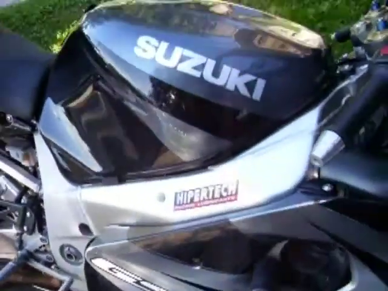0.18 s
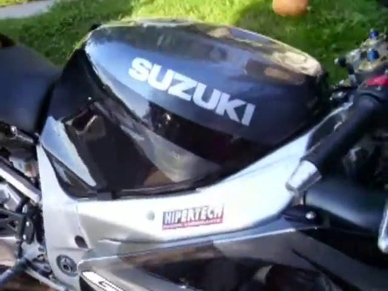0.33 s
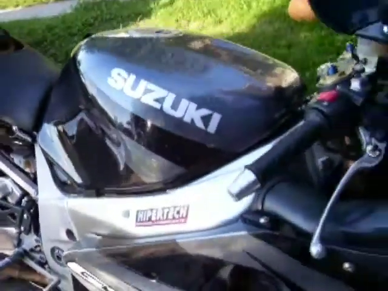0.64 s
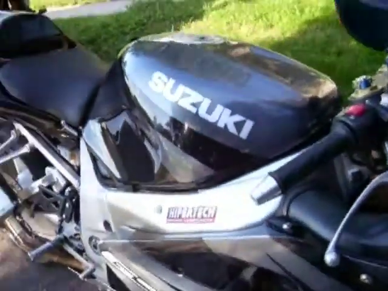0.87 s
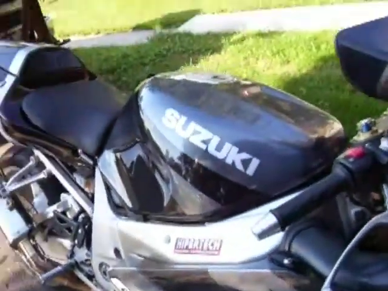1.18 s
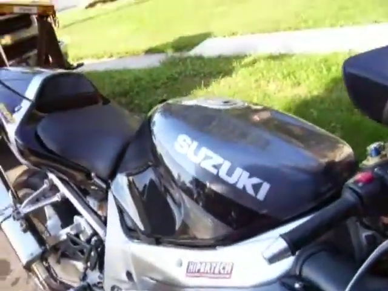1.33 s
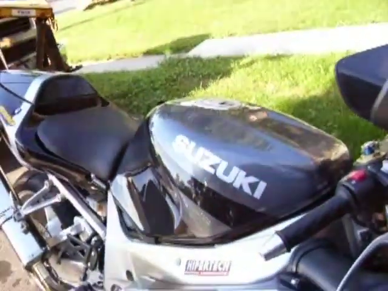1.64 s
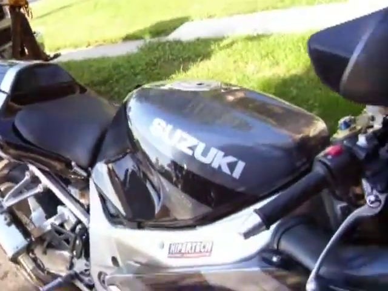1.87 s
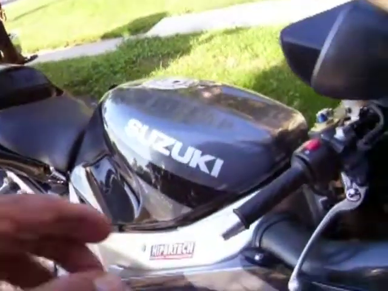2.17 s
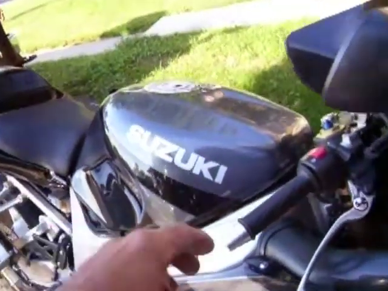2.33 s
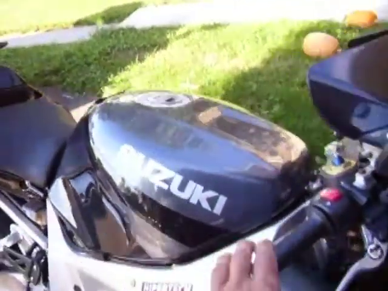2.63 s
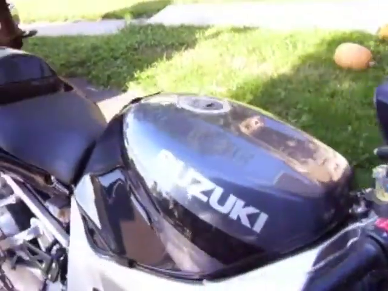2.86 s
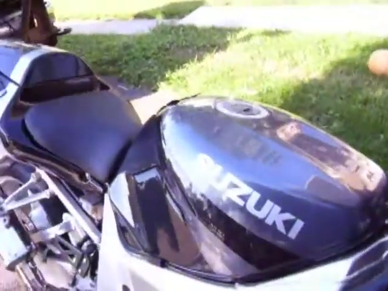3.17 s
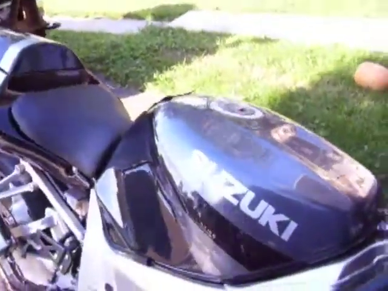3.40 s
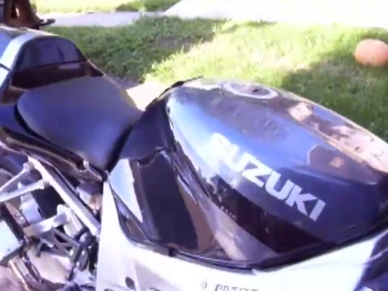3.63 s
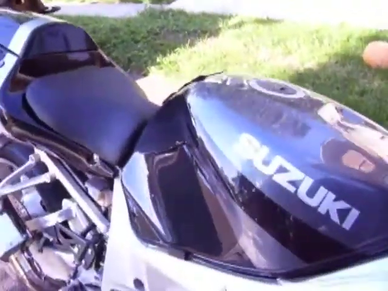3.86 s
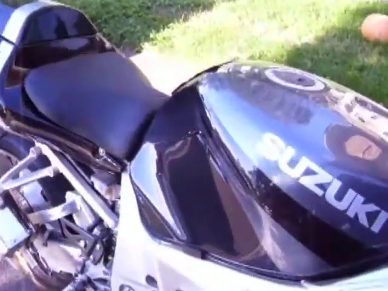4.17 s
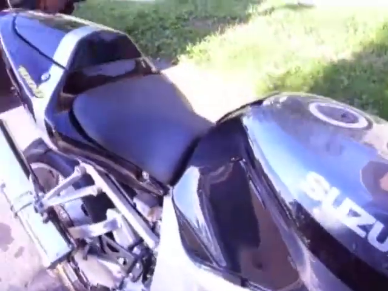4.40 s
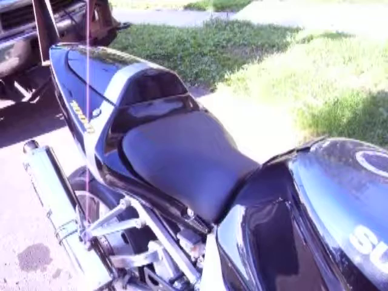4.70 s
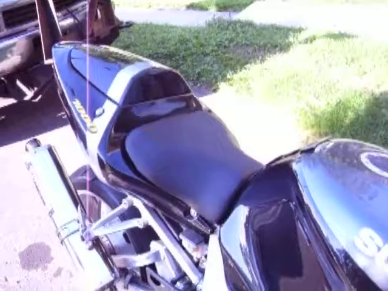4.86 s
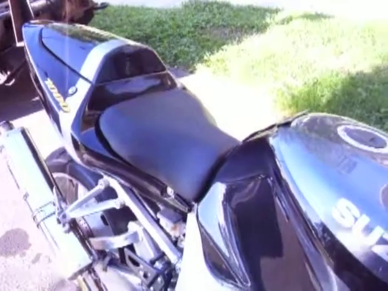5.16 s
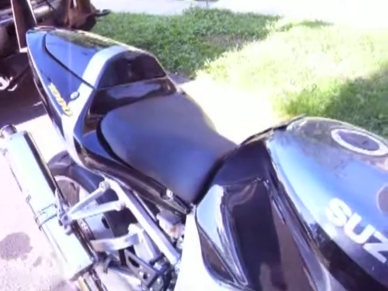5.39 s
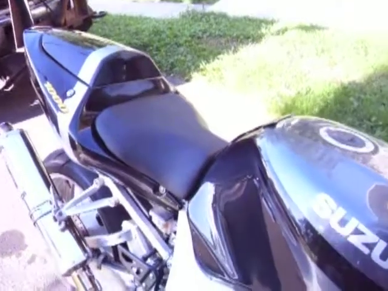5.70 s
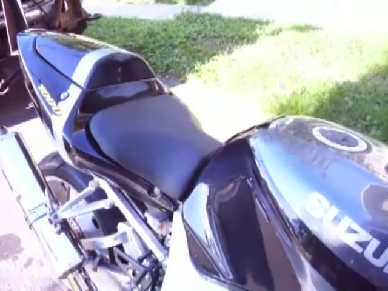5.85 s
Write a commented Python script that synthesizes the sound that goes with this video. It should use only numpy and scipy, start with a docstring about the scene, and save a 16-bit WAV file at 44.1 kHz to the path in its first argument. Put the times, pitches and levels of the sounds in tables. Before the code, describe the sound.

A sport motorcycle is already idling outdoors, close to a cheap handheld microphone. The low exhaust beat surges five or six times a second over dense valve and clutch rattle and a thin gear whine. A rasp fades in the first second; the hollow case ring thins mid-way, then returns. The level ducks suddenly and creeps back, with dull, clipped, crackly sound and two faint hooting tones near the end.

```python
"""A four-cylinder sport motorcycle idles in a yard: impulses from its firings excite the exhaust resonances,
hard and soft by turns, over a hum, as the crank speed hunts between five and six times a second.
From the start valves and clutch strike the cases, gear teeth whine by meshing, and a rasp fades within a second or so;
the ring of the cases sinks after about two seconds and returns after three and a half. Throughout, the level drops
abruptly and creeps back, and a clipped narrow-band channel crackles; near the end two brief tones hoot."""
import sys
import numpy as np
from scipy import signal
from scipy.fft import rfft, irfft, next_fast_len
from scipy.io import wavfile
from scipy.ndimage import uniform_filter1d

SR = 44100
rng = np.random.default_rng(int(sys.argv[2]) if len(sys.argv) > 2 else 0)


def store_wav(level_fs):
    """Save 16-bit WAV to argv[1]."""
    pcm = np.round(np.clip(np.atleast_2d(level_fs), -1, 1) * 32767)
    wavfile.write(sys.argv[1], SR, pcm.T.astype(np.int16))


N = 265923
T = np.arange(N) / SR

# Hunting of the idle: (time of low point [s], crank speed [Hz], exhaust swell [dB],
# time of top [s], crank speed [Hz], exhaust swell [dB])
SURGES = [(0.002, 40.08, -2.5, 0.084, 46.27, 1), (0.204, 40.1, -3, 0.292, 46.7, 1.0),
          (0.37, 41.29, -4.5, 0.464, 46.53, 1.5), (0.556, 44.08, -1.5, 0.625, 47.7, 3.5),
          (0.723, 42.27, 0.5, 0.804, 48.07, 1.5), (0.897, 40.9, -1.5, 0.988, 46.49, 4.0),
          (1.097, 41.2, -1.5, 1.178, 46.66, 2.5), (1.283, 42.2, -1, 1.362, 47.7, 2.5),
          (1.462, 42.15, 0, 1.528, 46.46, 2.5), (1.64, 40.68, -2, 1.734, 46.96, 4.5),
          (1.839, 40.51, -6, 1.933, 46.36, 5), (2.027, 39.81, -6.5, 2.138, 49.1, 7),
          (2.222, 41.5, -10.5, 2.3, 50, 5.5), (2.375, 43.95, -5, 2.452, 49.54, 5.5),
          (2.546, 40.88, -7.5, 2.656, 49, 7.5), (2.733, 42.4, -5.5, 2.804, 47.06, 4.5),
          (2.908, 39.9, -2.5, 3.024, 47.73, 6.5), (3.092, 42.55, -4.5, 3.184, 49.07, 5.5),
          (3.265, 44.05, -3.5, 3.336, 46.19, 4.5), (3.451, 40.5, -1, 3.557, 47.56, 6.5),
          (3.646, 40.24, -3, 3.755, 45.66, 1), (3.871, 41.19, -5, 3.966, 47.17, 0.5),
          (4.052, 41.94, -3.5, 4.14, 48.02, -1), (4.246, 40.87, -3, 4.316, 46.73, -5),
          (4.339, 41.14, 3, 4.373, 46.12, -4), (4.446, 40.25, -6.5, 4.565, 46.9, -4.0),
          (4.619, 43.17, -0.5, 4.691, 46.74, 1.5), (4.821, 42.58, -0.0, 4.93, 46.29, 0.5),
          (4.986, 42.48, -2, 5.044, 46.66, 3.5), (5.156, 41.96, -3, 5.25, 48.42, 2.5),
          (5.334, 41.67, -7, 5.404, 48.68, 6), (5.522, 40.01, -1.5, 5.602, 48.86, 4.5),
          (5.701, 42.68, -7.5, 5.772, 46.45, 3.5), (5.875, 41.77, -3.5, 5.989, 47.5, 4)]
# Abrupt drops of the overall level: (time [s], depth [dB], recovery [dB/s])
DROPS = [(0, 4, 10), (0.591, 6, 8.5), (1.488, 5.5, 8), (2.271, 5.5, 9), (2.325, 11.5, 8), (4.314, 5.5, 4.5),
         (4.516, 14.5, 224), (5.038, 7, 9.5), (5.936, 6.5, 10)]
# Balance as the listening point moves along the machine: (time [s], case body [dB], case ring [dB],
# gear whine [dB], low hum [dB], upper hum [dB], valve clatter [dB]); body, ring and valves are relative
ALONG_BIKE = [(0, 4.5, 2.5, -14.5, -24, -19, -1.5), (.4, 2.5, 3.5, -17.5, -19.5, -18, 2.5),
              (.8, 2.5, 4, -21, -23.5, -24, 1), (1.35, 2, 1, -18.5, -21.5, -19.5, 1),
              (2.18, 3, -5.5, -16.5, -25, -30, 0.3), (2.5, 3, -12, -15, -34, -33.5, 0.7),
              (3.3, 2, -12.5, -19, -31.5, -32, 0), (3.62, 1.5, -5.5, -17, -19.5, -22.5, 1.5),
              (3.68, 2.5, 4.5, -18, -23.5, -21.5, 1.2), (4.14, 4, 2.5, -17.5, -20, -21.5, 2),
              (4.28, 3, 7.5, -16, -20, -16.5, .8), (4.45, 4, -1, -16, -22, -19.5, 2.5),
              (5.2, 5, -2.5, -18, -25.5, -19, 1), (6.03, 3.5, -1.5, -18, -26, -21.5, 1.3)]
# Two brief tones: (time [s], length [s], frequency [Hz], level [dB])
HOOT = [(5.865, 0.084, 850, -22), (5.85, 0.48, 635, -18)]
# Stretches of light crackle: (start [s], end [s])
CRACKLE_STRETCHES = [(.22, .3), (.38, .51), (1.19, 1.46), (2.05, 2.27), (3.55, 3.61), (3.87, 4.31),
                     (4.82, 4.93), (5.57, 5.64), (5.73, 5.93)]
# Hardest crackles, before colouring: (time [s], level [dB])
HARD_CRACKLES = [(.225, -31), (.384, -28), (.409, -26), (.468, -27), (.511, -26.5), (.581, -30), (1.2, -36),
                 (1.276, -24), (1.304, -27), (1.364, -28), (1.457, -33.5), (2.054, -32), (2.078, -27.5),
                 (2.1, -31), (2.141, -24), (2.234, -25.5), (3.686, -35), (3.787, -33), (3.879, -25),
                 (3.932, -25), (3.975, -25.5), (4.062, -27), (4.092, -23), (4.109, -26), (4.133, -19.5),
                 (4.261, -27), (4.296, -27), (4.312, -21.5), (4.924, -29), (4.993, -26), (5.014, -26.5),
                 (5.593, -30), (5.795, -25), (5.901, -20.5), (5.933, -24)]
# Spectrum of one crackle: (frequency [Hz], gain [dB])
CRACKLE_COLOUR = [(3500, 22), (4800, 18), (7000, 12), (10000, 9), (15000, -0.5)]
# Fizz at the channel's upper edge: (frequency [Hz], relative gain [dB])
FIZZ = [(3000, -39), (3750, -0.5), (4100, 1), (5000, -42.5)]
# Low lines of the hum: (multiple of its fundamental [1], relative level [dB])
HUM_LINES = [(1, -17.5), (2, -1)]
# Gear teeth taking up the load: (time [s], extra level [dB])
CHIRPS = [(.41, 5), (.8, 5), (2.065, 5.5), (2.95, 5.5), (3.47, 5.5), (4.38, 1.5), (4.49, 5), (5.54, 3.5)]
# Resonance of engine cases and fairing: (frequency [Hz], relative gain [dB])
CASE_BODY = [(28, -45), (60, -10.5), (110, -3.5), (150, -9.5), (300, -2), (400, -5.5), (500, -1),
             (650, -1.5), (790, 1.5), (1040, -1.5), (1190, -8), (1600, -19.5), (3000, -38)]
# Main ring of the cases: (frequency [Hz], relative gain [dB])
CASE_RING = [(600, -39), (850, -10), (925, -.5), (975, -2), (1045, -6.5), (1250, -37)]
# Resonance of valve gear and clutch: (frequency [Hz], relative gain [dB])
CLATTER = [(200, -9.5), (900, -22), (1300, -2), (1700, -4.5), (2000, -3), (2150, -1), (2400, 0),
           (2700, -0.5), (3300, -2.5), (3650, -8), (3900, -13.5), (4400, -36)]
# Rasp low on the engine side: (frequency [Hz], relative gain [dB])
RASP = [(1400, -27.5), (1750, -4), (2000, 0.5), (2300, -12), (2700, -45)]
# Low exhaust orders: (multiple of crank speed [1], relative level [dB])
DRONE = [(1, -17.5), (2, -11), (3, -31)]
# Four firings of a two-turn cycle: (place [crank turns], relative level [dB])
FIRINGS = [(0, -0.5), (0.5, -12.5), (0.998, 0), (1.503, -18.5)]
# Resonance of exhaust pipe and silencer: (frequency [Hz], relative gain [dB])
PIPE = [(30, -29.5), (100, -14), (150, -27.5), (190, -8.5), (232, 2), (258, -3), (280, 1), (300, 0.5),
        (360, 0.5), (405, -15), (560, -17.5), (800, -29), (1500, -47)]

START_TURN = 0.667  # crank turns
# each dip is a share of the way from the low point's speed down to the stall speed
STALL_HZ, STUMBLE_SHARE, STUMBLE_S, STUMBLE_LAG_S = 37.5, 0.55, 0.016, 0.004
FLARE_DB, FLARE_S = 2, 0.068  # rise of the machinery ahead of each drop
LIGHT_CRACKLE_DB, LIGHT_CRACKLES_PER_S = -36, 45
HUM_HZ, HUM_DRIFT = 45.76, 0.011  # drift is an rms fraction of the frequency
UPPER_HUM_MULTIPLE, UPPER_HUM_DB = 6, -2
# dB of each source per dB of exhaust swell
LOW_HUM_SHARE, UPPER_HUM_SHARE, CASE_SHARE, DRONE_SHARE = 0.45, 0.083, 0.17, 0.29
GEAR_TEETH, CHIRP_S = 72, 0.012
LOW_SPEED_HZ = 36  # crank speed from which the whine's level is reckoned
WHINE_DB_PER_HZ = -0.1869  # the gears sing loudest when the crank labours
WHINE_DB_PER_HZ_PER_S = 0.0151  # and louder while it gathers speed
CLATTER_DB_PER_HZ_PER_S = -0.0081  # the clatter softens as the crank gathers speed
CLUMP_DB = 1.02  # rms unevenness of the clatter
CLATTER_DB, RING_DB, FIZZ_DB = -19.5, -24, -26
RASP_DB, RASP_FADE_DB_PER_S = -17.5, 21
DRONE_DB, EXHAUST_DB = -18, -19
PUFF_DB = -8.5  # gas noise relative to the pipe's ring
EXHAUST_LAG_S = 0.0042
LOW_CUT_HZ, CHANNEL_RATE, CHANNEL_HZ, EDGE_HZ = 20, 8000, 4300, 15900


def amp(db):
    """Logarithmic levels: decibels become an amplitude ratio."""
    return 10 ** (np.asarray(db) / 20)


def unit(x):
    """Normalisation: the mean square becomes 1."""
    return x / np.sqrt(np.mean(x ** 2) + 1e-20)


def curve(rows, axis=1):
    """Linear interpolation: one column of a time table at every sample."""
    rows = np.array(rows, float)
    return np.interp(T, rows[:, 0], rows[:, axis])


def wander(hz):
    """Low-passed noise: random motion of rms 1, up to about hz."""
    size = next_fast_len(N)
    f = np.fft.rfftfreq(size, 1 / SR)
    spectrum = rfft(rng.standard_normal(size)) * np.exp(-(f / hz) ** 2)
    return unit(irfft(spectrum, size)[:N])


def colour(x, points, size=8192):
    """Minimum-phase resonance: a causal filter, so that each blow rings after it lands."""
    hz, db = np.transpose(points)
    f = abs(np.fft.fftfreq(size, 1 / SR))
    log_gain = np.log(amp(np.interp(np.log(f + 1), np.log(hz), db)))
    response = np.exp(np.conj(signal.hilbert(log_gain)))
    ring = np.fft.ifft(response).real[:size // 2]
    return signal.oaconvolve(x, ring)[:N]


def strikes(cycles, scatter_db):
    """Impulse train: one click of uneven size at each whole number of cycles."""
    at = np.flatnonzero(np.diff(np.floor(cycles)) > 0)
    out = np.zeros(N)
    out[at] = amp(scatter_db * rng.standard_normal(len(at)))
    return out


def hunting():
    """Speed oscillation: crank speed and exhaust swell ease between low points and tops."""
    s, hz, db = np.reshape(SURGES, (-1, 3)).T
    index = np.arange(len(s))
    leg = np.interp(T, np.sort(s), index)
    eased = np.floor(leg) + np.sin(np.pi / 2 * (leg % 1)) ** 2
    speed = np.interp(eased, index, hz)
    swell_db = np.interp(eased, index, db)
    return speed, np.interp(T - EXHAUST_LAG_S, T, swell_db)


def stumbles():
    """Compensated pulse: crank speed dips sharply at each low point, made up for on either side."""
    out = np.zeros(N)
    for s, low_hz, *_ in SURGES:
        u = ((T - s - STUMBLE_LAG_S) / STUMBLE_S) ** 2
        near = u < 30
        depth_hz = STUMBLE_SHARE * (low_hz - STALL_HZ)
        out[near] -= depth_hz * (1 - u[near]) * np.exp(-u[near] / 2)
    return out


def pull(speed):
    """Acceleration: the limited rate of change of crank speed, in Hz per second."""
    return np.clip(np.gradient(speed) * SR, -150, 150)


def drops():
    """Level envelopes in dB: abrupt drops with linear recovery, and a flare leading into each."""
    level_db, flare_db = np.zeros(N), np.zeros(N)
    for s, depth_db, recovery in DROPS:
        level_db = np.minimum(level_db, (T >= s) * (recovery * (T - s) - depth_db))
        flare_db += FLARE_DB * (T < s) * np.exp(-abs(T - s) / FLARE_S)
    return uniform_filter1d(level_db, size=130), uniform_filter1d(flare_db, size=130)


def yard(x):
    """Diffuse reflection: a short decaying scatter from fairing, paving and nearby walls."""
    t = T[:SR // 4]
    tail = rng.standard_normal(len(t)) * amp(-60 * t / 0.2)  # 60 dB of decay in 0.2 s
    return x + amp(-10.5) * signal.oaconvolve(x, tail / np.linalg.norm(tail))[:N]


def crackle(x):
    """Impulsive distortion: tiny clicks oppose the sign of the waveform where they fall."""
    crackling = sum((T > start) & (T < end) for start, end in CRACKLE_STRETCHES)
    at_random = rng.random(N) < LIGHT_CRACKLES_PER_S / SR
    clicks = crackling * at_random * amp(LIGHT_CRACKLE_DB + rng.uniform(-9, 6, N))
    for s, db in HARD_CRACKLES:
        clicks[round(s * SR)] = amp(db)
    return colour(-np.sign(x) * clicks, CRACKLE_COLOUR)


def hoot():
    """Phase-modulated sinusoids: two brief, slightly wavering tones."""
    out = np.zeros(N)
    for s, length, hz, db in HOOT:
        swell = np.sqrt(abs(np.sin(np.pi * np.clip((T - s) / length, 0, 1))))
        tone = np.sin(2 * np.pi * (hz * T + 0.1 * wander(40)))
        out += amp(db) * swell * np.sqrt(2) * tone
    return out


def hum(swell_db):
    """Harmonic series: two low lines and a clear upper one drift together, steadier than the beat."""
    phase = 2 * np.pi * np.cumsum(HUM_HZ * (1 + HUM_DRIFT * wander(3.92))) / SR
    low = sum(amp(db) * np.sin(k * (phase + 0.3 * wander(13))) for k, db in HUM_LINES)
    upper = np.sin(UPPER_HUM_MULTIPLE * phase + 0.8 * wander(13))
    low_db = curve(ALONG_BIKE, axis=4) + LOW_HUM_SHARE * swell_db
    upper_db = UPPER_HUM_DB + curve(ALONG_BIKE, axis=5) + UPPER_HUM_SHARE * swell_db
    return amp(low_db) * low + amp(upper_db) * upper


def whine(turns, speed):
    """Gear meshing: tooth contacts follow the crank; backlash and firing jolts shake pitch and force."""
    jolts = 0.07 * np.sin(4 * np.pi * turns) + 0.1 * np.sin(2 * np.pi * turns)
    mesh = GEAR_TEETH * turns + 0.19 * wander(210) + 0.25 * wander(40) + jolts
    force = amp(7.4 * np.tanh(0.85 * wander(83) + 0.2 * wander(29)))
    force = force * (1 + 0.21 * np.cos(2 * np.pi * turns))
    level_db = curve(ALONG_BIKE, axis=3) + WHINE_DB_PER_HZ * (speed - LOW_SPEED_HZ)
    level_db += WHINE_DB_PER_HZ_PER_S * pull(speed)
    level_db += sum(db * np.exp(-((T - s) / CHIRP_S) ** 2) for s, db in CHIRPS)
    return amp(level_db) * unit(force * np.cos(2 * np.pi * mesh))


def rattle(turns, points, grain_db, throb):
    """Filtered ticks and noise: ticks, as of valve seats and clutch plates, lie over a rush of noise."""
    valves = strikes(4 * turns + 0.06 * wander(90), scatter_db=2.5)
    loose = (rng.random(N) < 1300 / SR) * rng.uniform(-1.05, 1, N)  # about 1300 ticks a second
    rush = rng.standard_normal(N) * (1 + 0.17 * np.cos(4 * np.pi * turns))  # chain and intake
    grain = unit(unit(valves) + unit(loose))
    # once per crank turn, and once per camshaft turn
    cycle = 1 + throb * np.cos(2 * np.pi * (turns - 0.25)) + 0.061 * np.cos(np.pi * turns)
    clumps = amp(1.7 * wander(220))
    return unit(colour(cycle * clumps * (unit(rush) + amp(grain_db) * grain), points))


def fizz(turns, level_db, flare_db):
    """Band noise: a bright fizz follows drops and flares and throbs once a turn."""
    return amp(FIZZ_DB + level_db + flare_db) * rattle(turns, FIZZ, grain_db=3.0, throb=0.64)


def rasp(turns):
    """Exponential decay: the rasp low on the engine side fades as the listening point leaves it."""
    return amp(RASP_DB - RASP_FADE_DB_PER_S * T) * rattle(turns, RASP, grain_db=-1.0, throb=0.23)


def case_ring(turns):
    """Narrow resonance: the mechanical blows sound the main ring of the cases."""
    level_db = RING_DB + curve(ALONG_BIKE, axis=2)
    return amp(level_db) * rattle(turns, CASE_RING, grain_db=-5.0, throb=0.085)


def case_body(turns, swell_db):
    """Broad resonance: cases and fairing respond to the blows and partly follow the exhaust swell."""
    level_db = CLATTER_DB + curve(ALONG_BIKE) + CASE_SHARE * swell_db
    return amp(level_db) * rattle(turns, CASE_BODY, grain_db=-3.5, throb=0.12)


def clatter(turns, speed):
    """Load-dependent impact: valve gear and clutch sound unevenly, softer as the crank gathers speed."""
    level_db = CLATTER_DB + curve(ALONG_BIKE, axis=6) + CLATTER_DB_PER_HZ_PER_S * pull(speed)
    level_db = level_db + CLUMP_DB * wander(41)
    return amp(level_db) * rattle(turns, CLATTER, grain_db=-3.5, throb=0.17)


def drone(turns, swell_db):
    """Engine orders: the lowest multiples of crank speed swell with each surge, unevenly."""
    uneven = 1 + 0.24 * wander(30)
    lines = sum(amp(db) * np.cos(2 * np.pi * k * (turns - 0.1)) for k, db in DRONE)
    return amp(DRONE_DB + DRONE_SHARE * swell_db) * np.sqrt(2) * uneven * lines


def exhaust(turns, swell_db):
    """Impulse response: each firing rings the pipe and lets out a puff of turbulent gas."""
    blows = sum(amp(db) * strikes((turns - place) / 2, scatter_db=1.0) for place, db in FIRINGS)
    puff_envelope = signal.lfilter([1], [1, -np.exp(-1 / (0.004 * SR))], blows)  # 4 ms decay
    puffs = puff_envelope * rng.standard_normal(N)
    beat = unit(colour(blows, PIPE)) + amp(PUFF_DB) * unit(colour(puffs, PIPE))
    return amp(EXHAUST_DB + swell_db) * unit(beat)


def scene():
    """Common drive: one crankshaft times exhaust, drone, clatter and gears; hum and hoot are added."""
    speed, swell_db = hunting()
    speed = speed + stumbles()
    level_db, flare_db = drops()
    turns = START_TURN + np.cumsum(speed) / SR
    knocks = case_body(turns, swell_db) + case_ring(turns) + clatter(turns, speed) + rasp(turns)
    machinery = yard(amp(flare_db) * knocks + whine(turns, speed))
    # drops and flares act on the fizz a second time here, doubling its change in dB
    bright = amp(flare_db) * fizz(turns, level_db, flare_db)
    engine = hum(swell_db) + bright + machinery + drone(turns, swell_db) + exhaust(turns, swell_db)
    return (amp(level_db) * engine + hoot())[None]


def record(dry):
    """Band limiting and clipping: a telephone-rate channel loses deep bass, flattens peaks and crackles."""
    high_pass = signal.butter(2, LOW_CUT_HZ, "high", fs=SR, output="sos")
    thinned = signal.sosfiltfilt(high_pass, dry[0])
    samples = np.clip(signal.resample_poly(thinned, CHANNEL_RATE, SR), -0.6, 0.6)
    raised = np.clip(signal.resample_poly(samples, SR, CHANNEL_RATE)[:N], -0.69, 0.69)
    channel_filter = signal.firwin(101, CHANNEL_HZ, window=("kaiser", 8), fs=SR)
    smooth = signal.oaconvolve(raised, channel_filter, "same")
    edge_filter = signal.firwin(511, EDGE_HZ, window=("kaiser", 9), fs=SR)
    return signal.oaconvolve(smooth + crackle(smooth), edge_filter, "same")[None]


dry = scene()
out = record(dry)
store_wav(out)
```